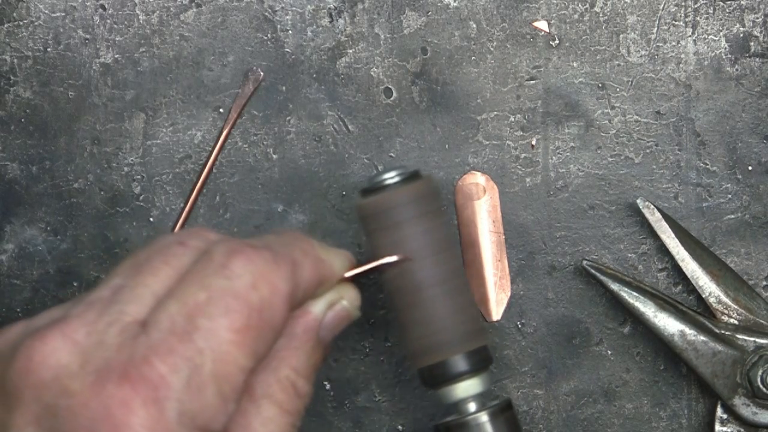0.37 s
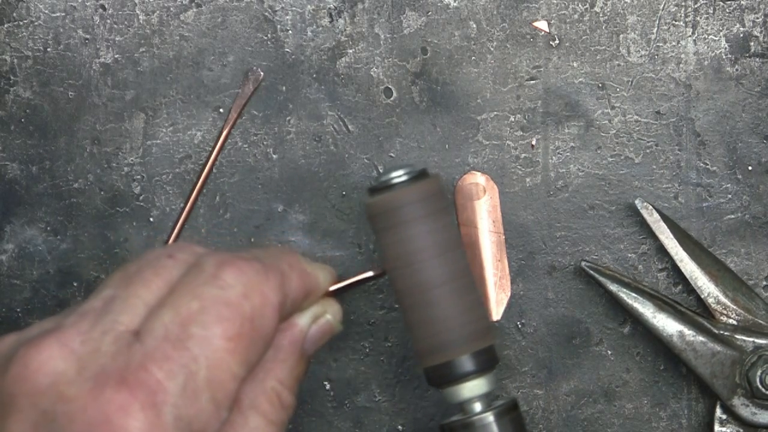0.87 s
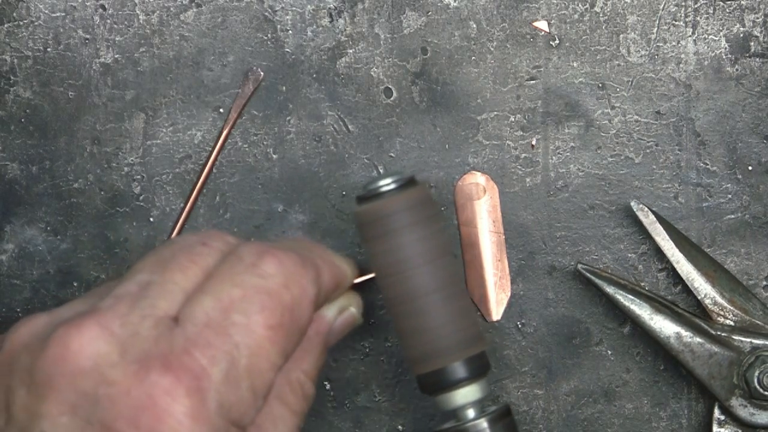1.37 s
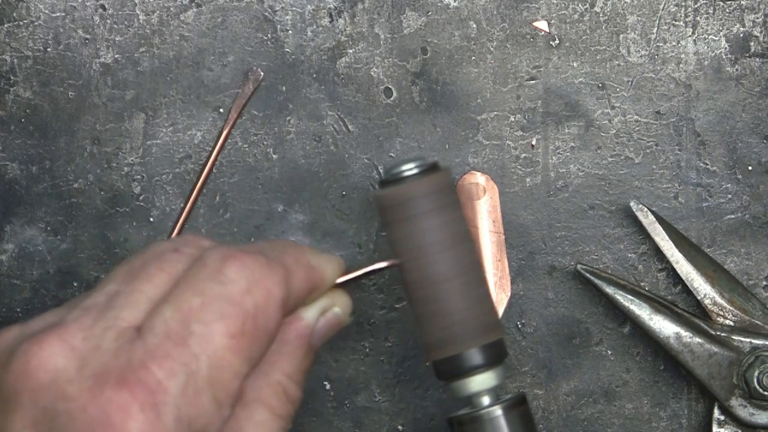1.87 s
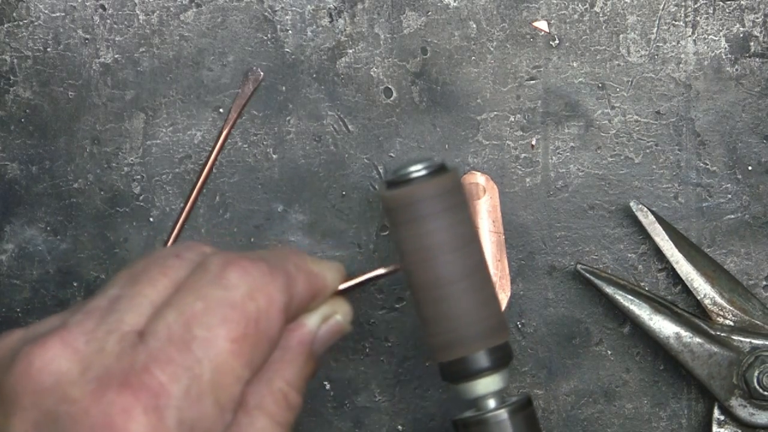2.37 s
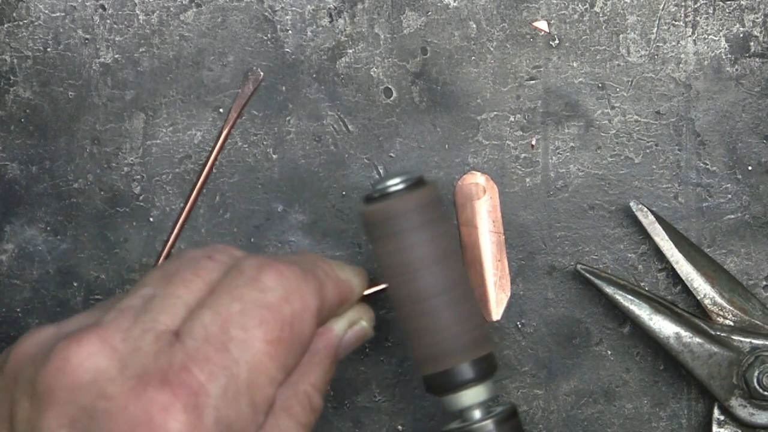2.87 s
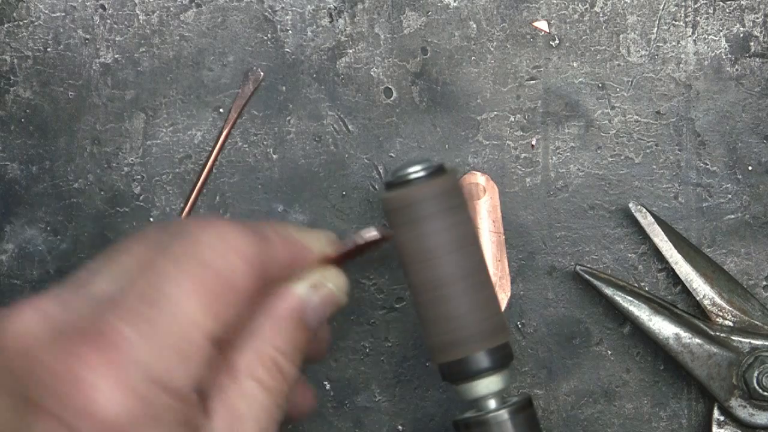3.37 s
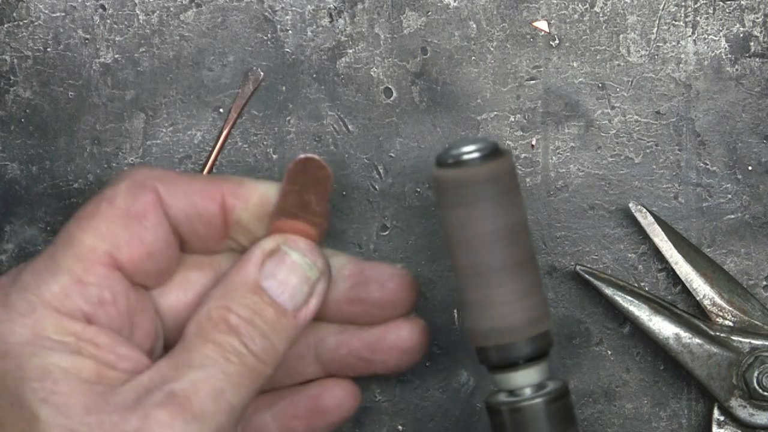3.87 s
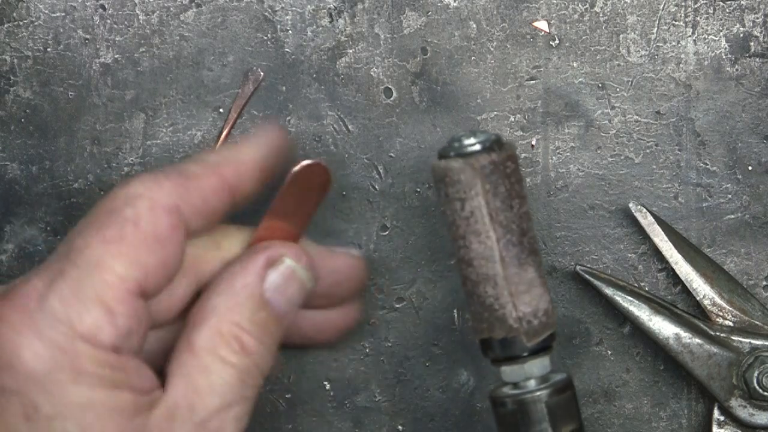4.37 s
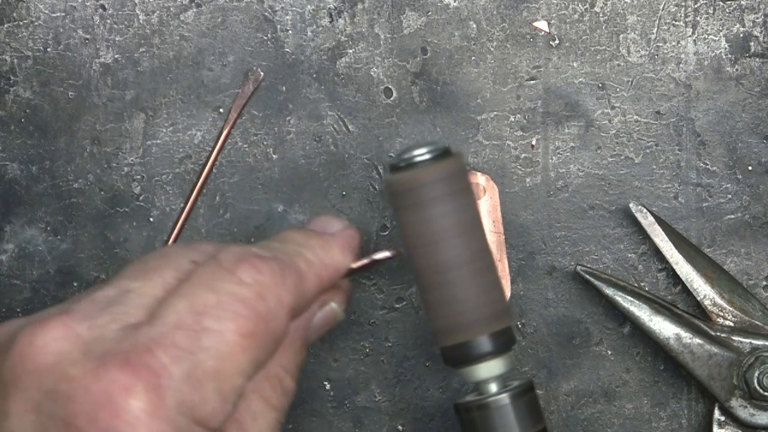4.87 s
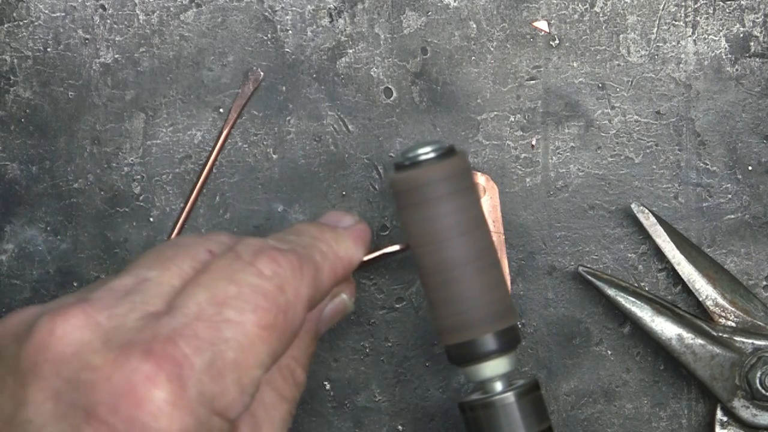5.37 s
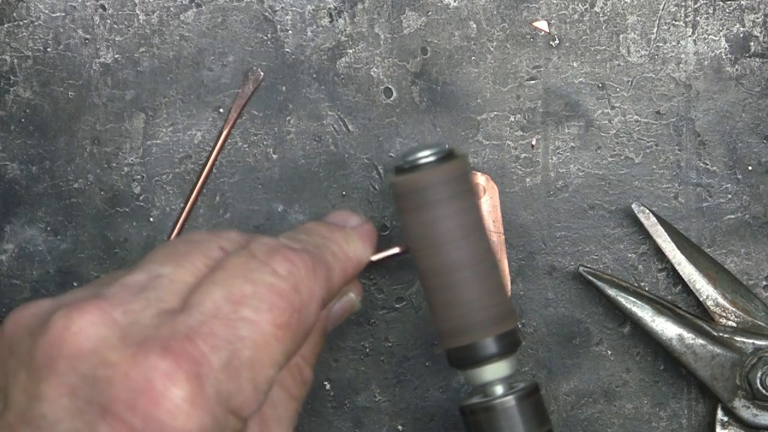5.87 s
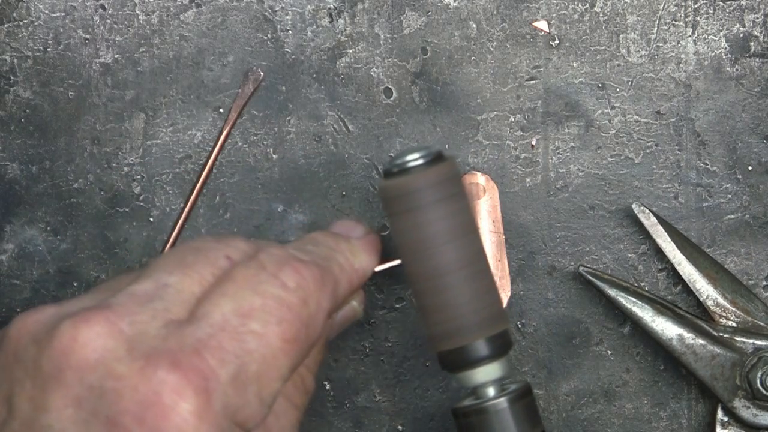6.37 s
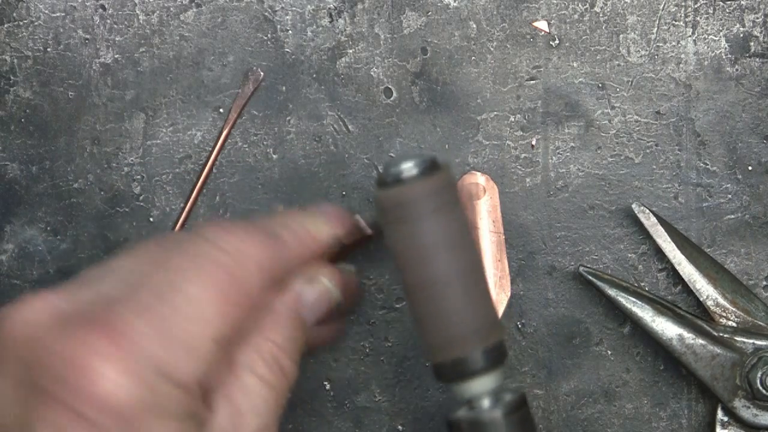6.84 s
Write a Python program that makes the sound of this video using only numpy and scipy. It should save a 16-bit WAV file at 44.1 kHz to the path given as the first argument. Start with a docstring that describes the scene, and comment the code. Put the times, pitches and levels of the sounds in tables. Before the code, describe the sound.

A small drum sander whines steadily while grinding a metal strip, brakes with a rattling downward groan, restarts abruptly, sands again and brakes at the end.

```python
"""Small drum sander in a workshop

A hand-held drum sander whines while a metal strip is pressed against it; it is braked almost to a stop,
restarted, and braked again at the end. The whine is a stack of sines at multiples ("orders") of the shaft speed,
which sags under load. Sanding is higher orders, noise and short rasps; braking and restarting add pole tones
and jolts that ring the housing and echo in the room. Steady hiss and hum lie underneath."""
import sys
import numpy as np
from scipy import signal
from scipy.fft import rfft, irfft, next_fast_len
from scipy.io import wavfile

SR = 44100
rng = np.random.default_rng(int(sys.argv[2]) if len(sys.argv) > 2 else 0)


def file_out(sig):
    """Save sig as 16-bit WAV at sys.argv[1]."""
    # one column per channel
    cols = np.atleast_2d(sig).T
    # limit, then scale
    lim = np.clip(cols, -1, 1)
    pcm = np.round(lim * 32767).astype(np.int16)
    wavfile.write(sys.argv[1], SR, pcm)


def gain_from_db(level_db):
    """Convert decibel levels to linear amplitude factors (20 dB per decade)."""
    decades = np.asarray(level_db, float) / 20
    return 10 ** decades


N = 307818   # length of the scene in samples

FREE_SPEED, STALL_SPEED = 150.3, 138.5   # turns per s; below the second the orders fade out
FREE_SANDING_DB = -52.5   # sanding level at free speed, before the contact table is added


def in_time(rows):
    """Joins the points of a two-column table by straight lines, one value a sample."""
    times, values = np.transpose(rows)
    return np.interp(np.arange(N) / SR, times, values)


def at_hz(points, hz):
    """Reads a spectrum table at any frequency, on a log-frequency axis."""
    table_hz, table_db = np.transpose(points)
    return np.interp(np.log(hz), np.log(table_hz), table_db)


def drift(rate_hz):
    """Slow random wander with spread 1, at every 64th sample: noise smoothed twice above rate_hz."""
    r = np.exp(-128 * np.pi * rate_hz / SR)
    noise = rng.standard_normal(N // 64 + 1002)
    slow = signal.lfilter([1], [1, -2 * r, r * r], noise)[1000:]   # skip the filter's start
    return slow / np.std(slow)


def stretch(slow):
    """Fills in a curve known at every 64th sample to every sample."""
    return np.interp(np.arange(N) / 64, np.arange(len(slow)), slow)


def coloured(spectrum):
    """Steady noise with the given spectrum shape, rms 1."""
    size = next_fast_len(N)
    white = rfft(rng.standard_normal(size))
    gain = gain_from_db(at_hz(spectrum, np.fft.rfftfreq(size, 1 / SR) + 1))
    noise = irfft(white * gain, size)[:N]
    return noise / np.std(noise)


def butter(x, order, hz, kind="low"):
    """Butterworth filter: low, high or band."""
    return signal.sosfilt(signal.butter(order, hz, kind, fs=SR, output="sos"), x)


def hiss():
    """Microphone hiss: steady noise, weaker towards the treble."""
    # relative density of the hiss: (frequency [Hz], level [dB])
    hiss_spectrum = [(20, -4), (100, -9), (500, -10.5), (1000, -14), (3000, -14.5), (8000, -17),
                     (15000, -16)]
    return gain_from_db(-59) * coloured(hiss_spectrum)


def hum():
    """Mains hum: one steady low sine."""
    hum_hz, rms_db = 59, -76
    return np.sqrt(2) * gain_from_db(rms_db) * np.sin(2 * np.pi * hum_hz * np.arange(N) / SR)


def workshop(x, t60_s=0.29, cut_hz=3000):
    """Room echo: the sound is smeared by a tail of dull noise that dies away."""
    t = np.arange(SR // 2) / SR
    tail = rng.standard_normal(len(t)) * gain_from_db(-60 * t / t60_s)
    tail = tail * (t > .008)   # the echo starts after 8 ms
    tail = butter(tail, 1, cut_hz)
    return signal.fftconvolve(x, tail / np.sqrt(np.sum(tail ** 2)))[:N]


def powered_speed():
    """Shaft speed under power, pulled down as the strip is pressed on."""
    # speed before braking and restart act on it: (time [s], speed [turns/s])
    loaded_speed = [(0.04, 144.8), (0.19, 143.8), (0.26, 146), (0.32, 144), (0.39, 146.1), (0.45, 144.9),
                    (0.5, 146.2), (0.64, 146.4), (0.75, 147.4), (0.85, 147.4), (0.95, 149.3), (1.11, 146.2),
                    (1.31, 147.6), (1.5, 147.3), (1.6, 146.6), (1.66, 147.7), (1.83, 147.1), (2.0, 143.8),
                    (2.07, 143.9), (2.19, 146), (2.27, 144.1), (2.33, 144.7), (2.37, 147.7), (2.45, 148.1),
                    (2.51, 150.2), (2.67, 149.4), (2.77, 146.5), (2.85, 146.5), (3.03, 149.4), (3.1, 147.3),
                    (3.34, 144.4), (3.42, 145.3), (3.45, 148), (3.53, 150.3), (4.98, 150.3), (5.03, 148.8),
                    (5.21, 147.8), (5.32, 144.9), (5.46, 144.7), (5.88, 141), (5.98, 139.7), (6.1, 142.9),
                    (6.26, 144.3), (6.38, 143.1), (6.63, 143.5), (6.77, 139.9), (6.83, 142.2),
                    (6.88, 148.1), (6.92, 148.8)]
    return in_time(loaded_speed)


def shaft():
    """Share of powered speed, seconds since the latest or coming braking, and seconds since the restart."""
    first_brake_s, restart_s, second_brake_s = 3.687, 4.49, 6.954
    quick_share, quick_s, coast_s = 0.6, 0.035, 0.2   # braking sheds part of the speed fast, the rest slowly
    spin_up_s, creep_share, creep_s = 0.063, 0.24, 0.062   # the last of the speed comes back slowly
    t = np.arange(N) / SR
    braked = np.where(t < restart_s, t - first_brake_s, t - second_brake_s)
    after = np.maximum(braked, 0)
    coasting = quick_share * np.exp(-after / quick_s) + (1 - quick_share) * np.exp(-after / coast_s)
    started = t - restart_s
    creep = 1 - creep_share * np.exp(-np.abs(started) / creep_s)
    regained = np.where(started > 0, np.tanh(started / spin_up_s) * creep, 1)
    return np.clip(coasting * regained, .02, 1), braked, started


def sanding_level(powered, speed):
    """Sanding level in dB: rises with the sag in speed and the width of strip touching, falls as the shaft slows."""
    # width of strip in contact: (time [s], level [dB])
    contact_width = [(0, 1), (0.65, 4), (0.85, -0.7), (2.4, 0.5), (2.8, 1.6), (3.4, -0.3), (5.3, 0.5),
                     (6.3, 0.8), (6.9, -0.3)]
    most_gain_db, sag_scale = 6.0, 2.67   # sag scale in turns per s
    sag = np.maximum(FREE_SPEED - powered, 0)
    pressed_db = most_gain_db * (1 - np.exp(-sag / sag_scale)) + in_time(contact_width)
    return FREE_SANDING_DB + pressed_db - 0.21 * np.maximum(STALL_SPEED - speed, 0)


def housing(x):
    """The tool body rings at several resonances side by side."""
    # resonances of the body: (frequency [Hz], width [Hz], level [dB])
    resonances = [(530, 104, 4.5), (286, 140, -10), (620, 77, -11.5), (1180, 200, -8), (1350, 87, -9.5),
                  (2650, 150, -7)]
    out = 0
    for k, (hz, width, level_db) in enumerate(resonances):
        r = np.exp(-np.pi * width / SR)
        poles = [1, -2 * r * np.cos(2 * np.pi * hz / SR), r * r]
        ring = signal.lfilter([1, 0, -1], poles, x)
        out = out + (-1) ** k * gain_from_db(level_db) * (1 - r * r) / 2 * ring   # every second one is flipped
    return out


def knocks():
    """Soft blows as the drive's torque reverses or takes hold: they ring the housing and kick the tool in the hand."""
    # blows before filtering: (time [s], relative level [dB])
    blow_table = [(3.689, -40), (3.762, -31.5), (3.829, -36.5), (4.494, -40.5), (6.955, -33)]
    blows = np.full(N, 1e-18)
    for s, level_db in blow_table:
        blows[round(s * SR)] = 100 * gain_from_db(level_db)
    soft = butter(blows, 2, 600)
    kick = butter(blows, 2, [20, 80], "band")   # low thump around 40 Hz
    return housing(soft + gain_from_db(-26.0) * blows) + gain_from_db(-16) * kick


def current(motion, brake_db, ahead_s, rise_s, power, start_db, hold_s):
    """Gain of one surge layer: braking current falls with speed, starting current holds and then dies."""
    share, braked, started = motion
    braking = gain_from_db(brake_db) * np.clip((braked + ahead_s) / rise_s, 0, 1) ** 2 * share ** power
    held = gain_from_db(start_db - 307 * np.maximum(started - hold_s, 0))   # falls by 307 dB per s after the hold
    return braking + held * np.clip(started / 0.025, 0, 1)   # comes up in 25 ms


def surge(speed, angle, motion, uneven_db=3.5, rough_db=5.5):
    """Heavy current: the pole tone and its octave glide with speed, one jolt per pole rattles the housing."""
    poles = 4   # magnet poles passed per turn
    tone = current(motion, brake_db=-20, ahead_s=0.001, rise_s=0.03, power=3.3, start_db=-42, hold_s=0.06)
    octave = current(motion, brake_db=-28, ahead_s=0.02, rise_s=0.018, power=1.5, start_db=-51, hold_s=0.15)
    rattle = current(motion, brake_db=-26.5, ahead_s=0.001, rise_s=0.036, power=1.8, start_db=-46, hold_s=0.085)
    octave = octave * gain_from_db(rough_db * stretch(drift(24.0)))
    upper = octave * np.sin(2 * poles * angle)

    # the brake first grabs hard: a short loud pole tone
    braked = motion[1]
    grab_rise_s, grab_hold_s = 0.0051, 0.0116
    grab_time = np.minimum(braked, grab_hold_s + grab_rise_s - braked)
    grab = gain_from_db(-20) * np.clip(grab_time / grab_rise_s, 0, 1)

    passes = np.diff(np.floor(poles * angle / (2 * np.pi)), prepend=0) > 0
    height = np.sqrt(SR / (poles * speed)) * 5.8   # evens out power as the jolts thin out
    jolts = passes * height * rattle * gain_from_db(uneven_db * rng.uniform(-1, 1, N))
    jolts = butter(jolts, 1, 2300)   # soft magnetic pull, no sharp edge

    grind = 3.5 * rattle * rng.standard_normal(N)   # brushes and bearings between the jolts
    under_power = (braked < 0) * (speed / FREE_SPEED) ** 5
    upper_poles = np.sin(4 * poles * angle) + np.sin(5 * poles * angle)
    grind += rattle * gain_from_db(23.5) * under_power * upper_poles

    direct = gain_from_db(-9.0) * upper + (grab + tone) * np.sin(poles * angle)
    direct = butter(direct, 2, 190, "high")   # a small tool sends out little bass
    return housing(upper + jolts + grind) + direct


def rush(angle, sanding_db, speed):
    """Noise of air and grit, beating once a turn and growing with the sanding."""
    # relative density of the rush: (frequency [Hz], level [dB])
    rush_spectrum = [(150, -29.5), (400, -23), (560, -7), (750, -10), (1500, -12.5), (2000, -12.5),
                     (2450, -3), (2900, -5.5), (3500, -12.5), (6000, -13.5), (7300, -13), (8000, -24.5),
                     (10500, -27.5), (13000, -37)]
    noise = coloured(rush_spectrum) * (1 + .3 * np.sin(angle)) * stretch(gain_from_db(.6 * drift(15.0)))
    level = gain_from_db(0.4 * (sanding_db - FREE_SANDING_DB) - 50.0)
    return level * noise * np.minimum(speed / 60, 1)   # fades below 60 turns per s


def scrapes(angle, decay_s=0.013):
    """Short bright rasps as the strip catches on the grit, pulsing once a turn."""
    # catches of the strip: (time [s], relative level [dB])
    catches = [(1.071, -34.5), (1.0989, -36), (1.18, -34.5), (4.9826, -34.5), (5.9197, -35), (5.9464, -34),
               (5.9799, -33)]
    t, shape = np.arange(N) / SR, 0
    for s, level_db in catches:
        shape = shape + gain_from_db(level_db - 11.5) * (t > s) * np.exp(-np.abs(t - s) / decay_s)
    grit = butter(rng.standard_normal(N), 2, [3500, 6500], "band")
    return shape * grit / np.std(grit) * (1 + np.cos(angle))


def sleeve(speed, angle, waver_db=4.5, patch_db=2.5, grip_db=1.0, fade_db=11.0, size=4):
    """The grit pattern passes once a turn: high orders swell alone and in groups as the contact wanders."""
    # strength of the high orders: (frequency [Hz], level relative to sanding level [dB])
    sanding_spectrum = [(3600, -18), (4300, -14), (4900, -18), (5600, -22.5), (6200, -16.5), (7100, -29),
                        (7600, -28), (8400, -32.5), (10300, -33)]
    slow, out = speed[::64], 0
    shared = grip_db * drift(15.0)[:len(slow)] - fade_db * np.maximum(STALL_SPEED - slow, 0)
    for first in range(25, 72, size):   # orders 25 to 72, above those of the whine
        group = shared + patch_db * drift(3.85)[:len(slow)]
        for order in range(first, first + size):
            alone = waver_db * np.tanh(drift(11.3))[:len(slow)]
            gain = gain_from_db(at_hz(sanding_spectrum, order * slow) + group + alone)
            out = out + np.sqrt(2) * stretch(gain) * np.sin(order * angle + rng.uniform(0, 2 * np.pi))
    return out


def whine(speed, angle, fade_db=3.5, waver_db=0.24, most_db=2.5):
    """Clean shaft orders; load recolours them, they fade below stall speed, and the higher ones waver more."""
    # shaft orders from the first up: (level running free [dB], level loaded [dB])
    order_levels = [(-71, -72), (-58.5, -61.5), (-57, -62), (-38.5, -38), (-55, -51.5), (-56, -59),
                    (-61, -49), (-54, -47.5), (-61.5, -58.5), (-65.5, -66), (-60.5, -57.5), (-59, -60.5),
                    (-65.5, -63), (-81, -65.5), (-54.5, -59), (-43.5, -53), (-59.5, -49.5), (-58, -51.5),
                    (-51, -48), (-51, -51), (-62, -61), (-58.5, -61), (-70, -56), (-65.5, -61)]
    # dips and peaks where the echo off the bench meets the whine: (frequency [Hz], width [Hz], change [dB])
    bench_dips = [(430.7, 9.9, -16), (582.6, 11.9, -5.5), (702, 17, -15.5), (882.5, 6.4, -8),
                  (991, 18, -6.5), (1022.5, 15, -13), (1189, 10.5, -9.5), (1331, 13, -11), (1508, 24, -11),
                  (1554, 53, -10), (1707, 36, -6), (1780, 27, -6), (1840, 39, -24), (2117, 64, -12),
                  (2258, 40, -10), (2364, 57, -3.5), (2425, 30, -10), (2690, 84, -6), (2788, 36, -10),
                  (2833, 80, -9), (2972, 20, -10.5), (3092, 90, 6), (3275, 73, -7), (3500, 90, -11)]
    contact_speed, loaded_speed = 149.8, 145.2   # turns per s between which load recolours the orders
    slow, out = speed[::64], 0
    load = np.clip((contact_speed - slow) / (contact_speed - loaded_speed), 0, 1)
    fade = -fade_db * np.maximum(STALL_SPEED - slow, 0)
    for order, (free_db, loaded_db) in enumerate(order_levels, start=1):
        waver = min(waver_db * order, most_db) * drift(10.3)[:len(slow)]
        dips = sum(db * np.exp(-(2 * (order * slow - hz) / width) ** 2) for hz, width, db in bench_dips)
        gain = gain_from_db(free_db + load * (loaded_db - free_db) + dips + fade + waver)
        out = out + np.sqrt(2) * stretch(gain) * np.sin(order * angle + rng.uniform(0, 2 * np.pi))
    return out


def scene():
    """Sander, its surges and knocks echoing in the room, hum and hiss; both channels alike."""
    motion, powered = shaft(), powered_speed()
    speed = powered * motion[0]
    angle = 2 * np.pi * np.cumsum(speed) / SR   # turning angle of the shaft
    sanding_db = sanding_level(powered, speed)
    jolts = surge(speed, angle, motion) + knocks()
    room = gain_from_db(-12.5) * workshop(jolts)
    contact = gain_from_db(sanding_db) * sleeve(speed, angle) + scrapes(angle)
    air = rush(angle, sanding_db, speed)
    mono = whine(speed, angle) + contact + air + jolts + room + hum() + hiss()
    return np.array([mono, mono])


def band_limit(x):
    """A steep low-pass at the top of the band."""
    return signal.sosfilt(signal.butter(12, 15880, fs=SR, output="sos"), x)


def record(dry):
    """Cuts the top of the treble steeply at 16 kHz."""
    top_cut = signal.cheby2(12, 60, 16000, fs=SR, output="sos")
    mix = signal.sosfilt(top_cut, dry)
    return band_limit(mix)


dry = scene()
out = record(dry)
file_out(out)
```